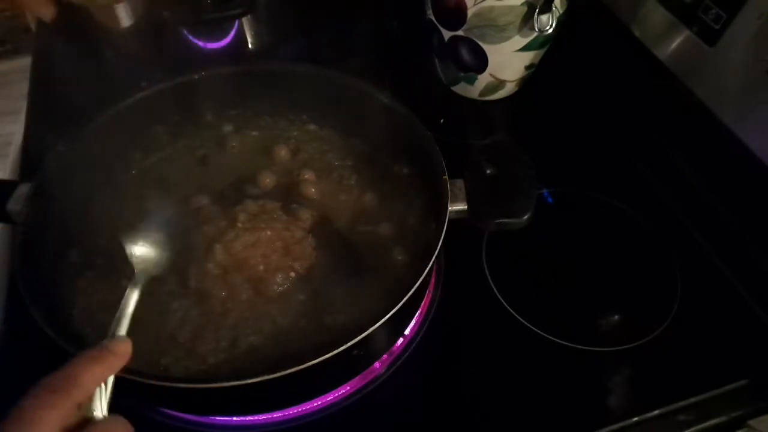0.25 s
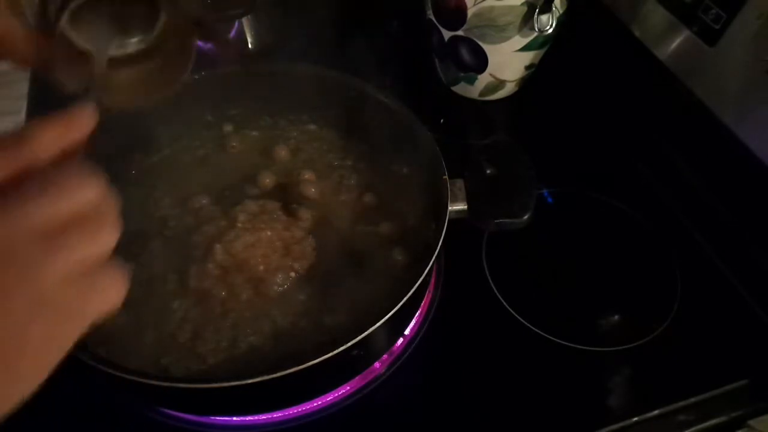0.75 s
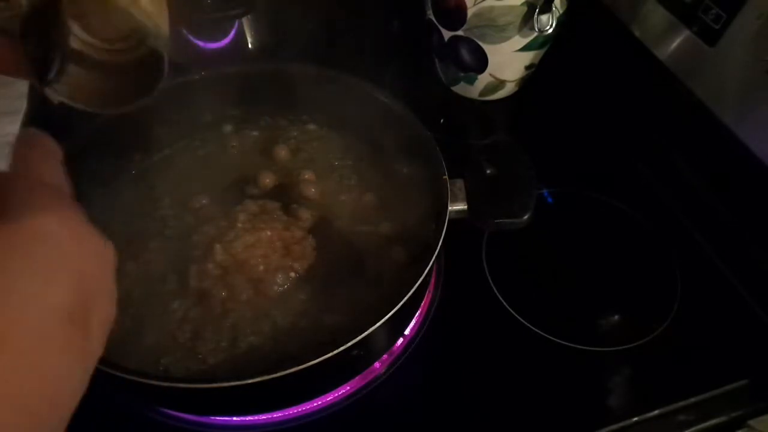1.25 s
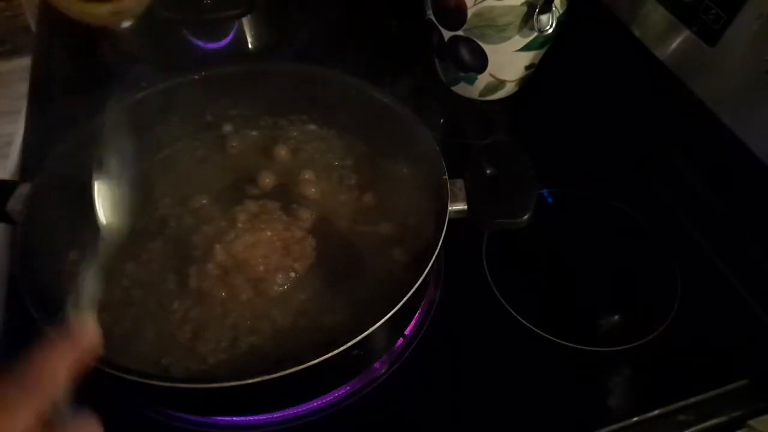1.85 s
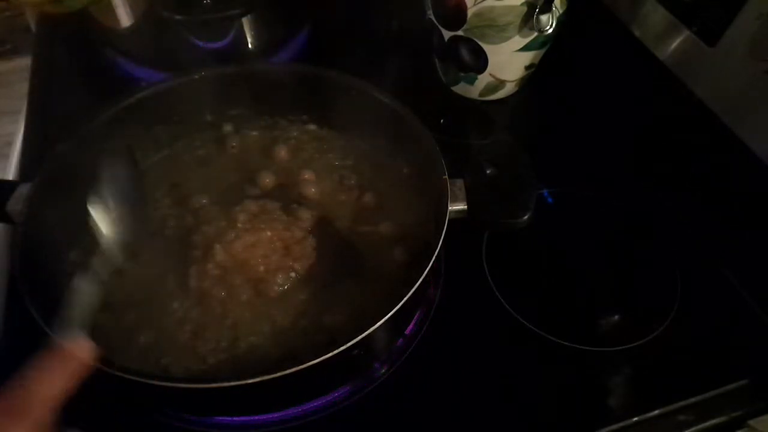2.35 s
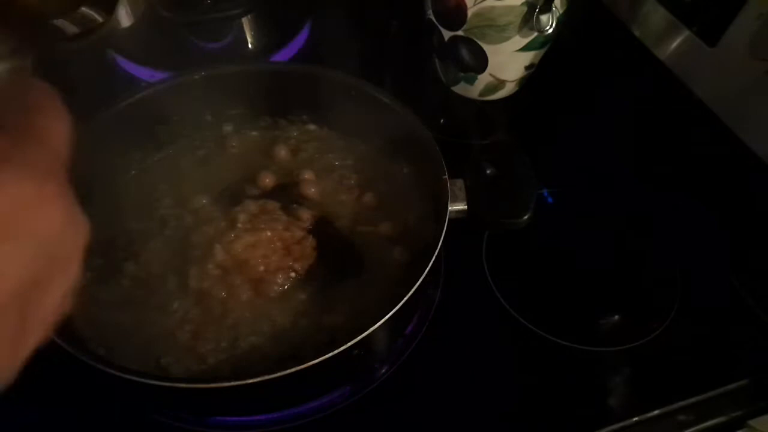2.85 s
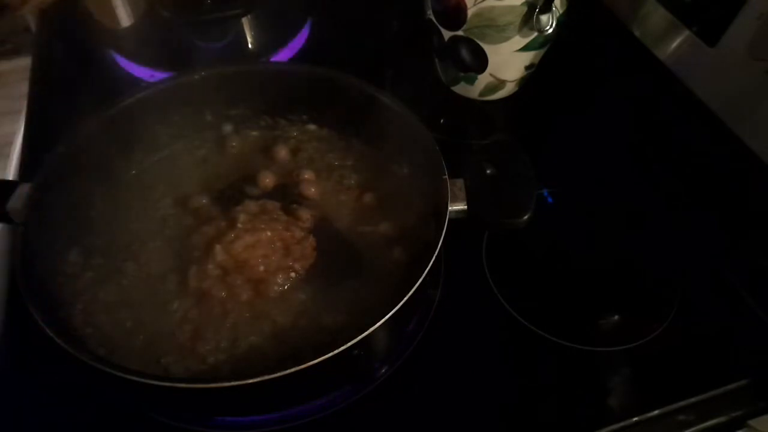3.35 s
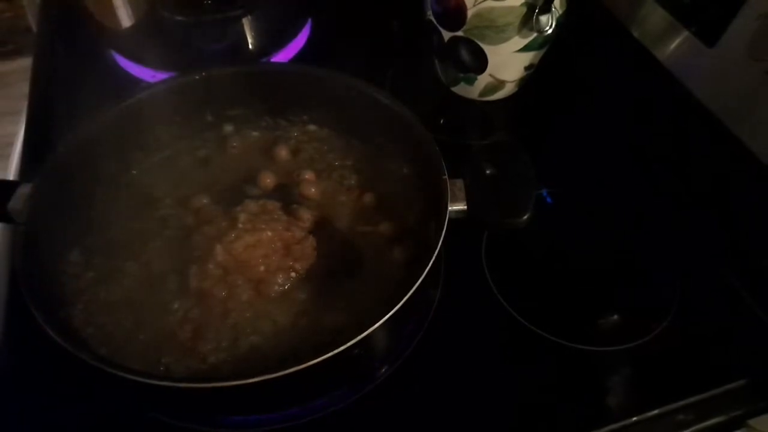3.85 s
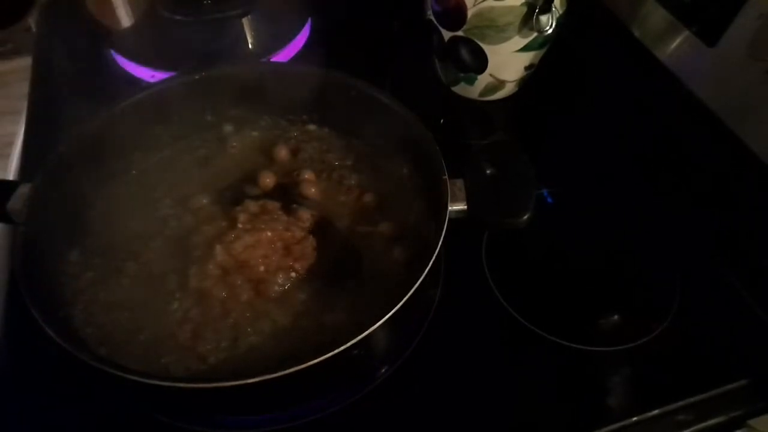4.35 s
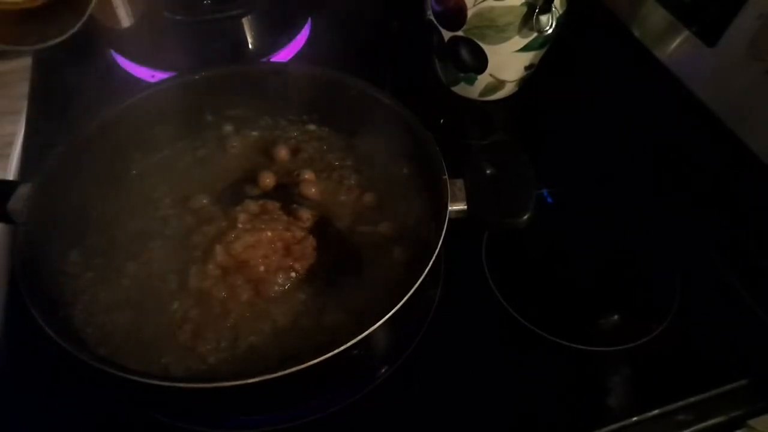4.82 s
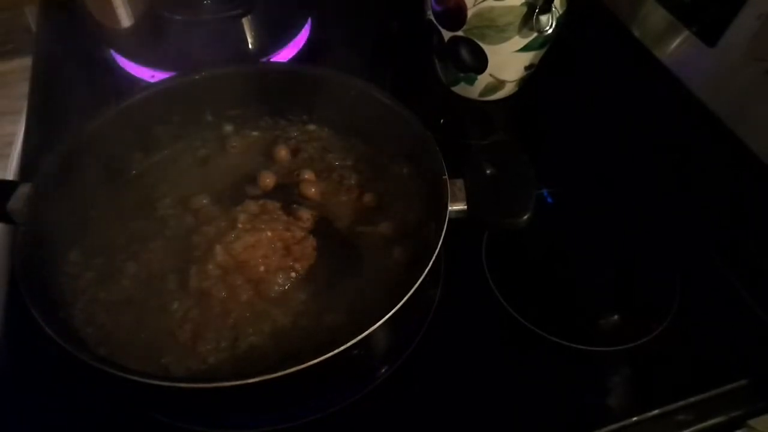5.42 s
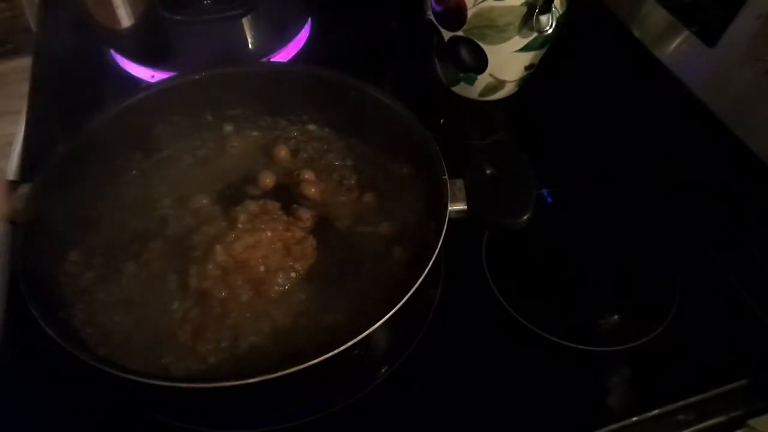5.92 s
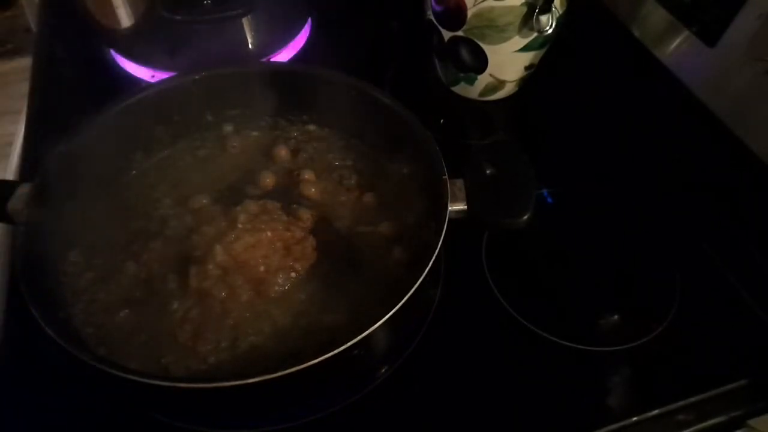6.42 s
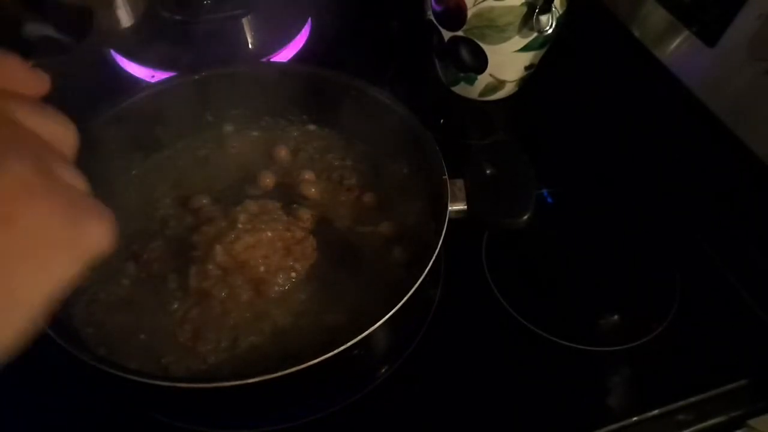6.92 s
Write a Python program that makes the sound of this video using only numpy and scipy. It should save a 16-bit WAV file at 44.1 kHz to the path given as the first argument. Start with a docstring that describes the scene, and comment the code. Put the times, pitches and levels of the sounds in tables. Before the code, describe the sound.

Two sharp double clanks of a spoon on a frying pan, each followed by hollow, ringing spoon taps in a tin can, with gentle frying beneath.

```python
"""In a small kitchen, a steel spoon digs chopped chilies out of a small can held close to the microphone.
A frying pan sizzles softly as noise with tiny pops, over a faint hum made from one sine wave.
Twice the spoon is knocked clean on the pan with a double blow: noise bursts plus the pan's own tones.
After each double blow it taps and scrapes in the can, whose air gives every touch a hollow note.
Each tap lands damped, then rebounds and lets the wall ring; the room adds a short tail."""
import sys
import numpy as np
from scipy import signal
from scipy.fft import rfft, irfft
from scipy.io import wavfile
from scipy.ndimage import uniform_filter1d, minimum_filter1d

SR = 44100
rng = np.random.default_rng(int(sys.argv[2]) if len(sys.argv) > 2 else 0)


def dump(signal):
    """Clip the signal to [-1, 1] and save it as 16-bit WAV at the path in sys.argv[1]."""
    limited = np.clip(np.atleast_2d(signal).T, -1, 1)
    pcm = np.round(limited * 32767).astype(np.int16)
    wavfile.write(sys.argv[1], SR, pcm)


N = 316197  # length of the scene in samples
T = np.arange(SR // 2) / SR  # time axis of one blow, s
BLOW = SR // 100  # 10 ms, the reference length for the energy of a blow
PORT_LAG_S = .00028  # the right microphone port is further from the can

# level of the frying hiss over time: t/s, level/dB
FRYING_LEVEL = [(0, -41.5), (.8, -45.5), (3.4, -43.5), (4.6, -48.5), (7.1, -45.5)]
# tone of the frying hiss: f/Hz, level/dB
SIZZLE_TONE = [(15, -48.5), (25, -25), (37, -14), (58, 2), (270, -10.5), (344, 1), (591, -3.5), (641, -6),
               (775, 0.5), (988, -1), (1520, 1), (2050, 0.5), (3160, -3.5), (12500, -7), (15000, 1.5),
               (16000, -2.5)]
# spoon on pan: t/s, level/dB, extra crash/dB, tilt of the pan tones by the spot struck/dB per octave
KNOCKS = [(0.2231, -6.5, 6.5, 6), (0.4268, -6.5, 6.5, 6.5), (2.049, -6.5, 9, 2.5), (2.259, -6, 7.5, 0)]
# tones of the pan on the glass hob, before tilt and scatter: f/Hz, level/dB, t60/s
PAN_MODES = [(93.4, -7.5, 0.3), (148, -8, 0.16), (218.5, 2.5, 0.072), (250, -8, 0.22), (346.5, 2, 0.12),
             (452, -25, 0.21), (564.3, -0.5, 0.078), (640.4, -16, 0.22), (1041, -11, 0.096),
             (1180, -7.5, 0.043), (1455, -15.5, 0.061), (2003, -20, 0.17), (2440, -25, 0.23),
             (3000, -21, 0.087), (5820, -20, 0.13)]
# bright crash of spoon on pan: f/Hz, level/dB
CRASH_TONE = [(1000, -55), (2000, -2), (3200, -2.5), (4500, -4.5), (6000, 1), (8300, -8.5), (10500, -8.5),
              (16000, 1)]
# thud of the pan into the hob: f/Hz, level/dB
THUD_TONE = [(20, -49), (60, -18), (120, -11.5), (300, -1), (600, 4.5), (850, -9.5), (1300, -7),
             (2200, -18.5), (6000, -37)]
# shivering tail of the pan: f/Hz, level/dB
SHIVER_TONE = [(150, 0), (400, 0), (700, 1.5), (1200, 5), (1700, -4.5), (2300, -5.5), (3100, -10),
               (4200, -16), (5900, -9), (8000, -13), (16000, -16.5)]
# spoon dragged along the can wall: start/s, length/s, strength/dB, rasp against note/dB, squeak f/Hz
SCRAPES = [(0.939, .063, -35, 0.5, 4420), (1.27, 0.095, -35, -21, 4040), (1.486, 0.092, -42, -5, 630),
           (1.545, .06, -44.5, 3, 1710), (1.593, 0.032, -40.5, 2.5, 2550), (2.824, .044, -47.5, 10, 3210),
           (2.986, 0.027, -26.5, -5.5, 4340), (3.602, 0.028, -49, 19, 4670),
           (3.869, 0.058, -49.5, 14, 4430), (4.352, 0.057, -46.5, 1.5, 5000),
           (6.07, 0.06, -39.5, 6.5, 3260), (6.369, .02, -51, 15, 6320), (7.098, 0.042, -48, -6, 4040)]
# spoon on can: t/s, strength/dB, clank against note/dB, tick against clank before its bite/dB,
# hollow note before the touch shifts it f/Hz, leading wall partial f/Hz, rebound after/s,
# rebound against landing/dB
TAPS = [(.867, -27, -17.5, 5, 1108, 3140, .003, -1), (.896, -14, -13, 2.5, 1119, 2630, 0.0049, 1.5),
        (1.014, -25, -18, 2, 1096, 2470, 0.0025, -1), (1.162, -33, -12, -3, 1130, 4410, .003, -3),
        (1.285, -28, -27, -4, 1050, 4050, 0.023, 1), (2.792, -26, -12, 6.5, 1054, 6550, .003, -5),
        (2.866, -16.5, -6.5, -4.5, 1257, 2585, .004, -1), (3.014, -18, -9.5, 0, 1087, 4126, .003, -4),
        (3.238, -41.5, -17, 2, 1100, 2530, .004, -2), (3.468, -43.5, 4.5, 3.5, 1160, 7630, .004, -7),
        (3.531, -13, -12, -1, 1211, 6370, .003, -3), (3.583, -15.5, -12, 6, 1250, 4650, 0.0097, -13),
        (3.632, -22.5, -9, 4.5, 1185, 2780, .007, 6), (3.685, -27, -9.5, -4, 1190, 4080, .004, -17),
        (3.841, -14, -8.5, -2.5, 1179, 3820, 0.0067, -9), (3.917, -16, -10.5, 3, 1148, 3950, 0.011, -1),
        (4.107, -16, -7.5, -2.5, 1267, 3450, 0.0079, -13), (4.161, -15, -8, -2.5, 1178, 4000, 0.016, 0),
        (4.334, -20, -11, -3, 1323, 2180, 0.005, -26), (4.383, -17, -5, -3, 1190, 4010, .017, 3),
        (4.614, -18, -10, 0.5, 1270, 2660, .008, 6), (4.668, -24, -16.5, -4, 1080, 3080, .004, -3.5),
        (4.827, -30, -10, 4.5, 1095, 3820, 0.0036, -7), (4.945, -18, -11.5, 5, 1187, 4326, 0.0074, -0.5),
        (5.005, -34.5, -8.5, -6, 1100, 2720, .004, 1.5), (5.145, -31.5, -1, 7.5, 1118, 3890, .004, -6),
        (5.246, -24, -9.5, 5, 1171, 4100, 0.0072, 7.5), (5.686, -26.5, -4, 2.5, 1095, 5150, .004, -3.5),
        (5.742, -26, -6, 8.5, 1140, 5500, .003, 0), (5.777, -26, -3.5, 6, 1065, 3536, .003, 1),
        (6.03, -35.5, -4.5, 3, 1113, 4200, 0.0057, -2), (6.069, -25.5, -7.5, 6.5, 1127, 7680, 0.015, 1),
        (6.288, -38, -18, -9, 1140, 3070, .004, -2), (6.388, -14.5, -12.5, 4.5, 1164, 2647, 0.0062, -2.5),
        (6.461, -14, -13.5, 1, 1179, 3876, 0.0071, -5), (6.669, -32, -10, -1.5, 1225, 3180, .004, -6),
        (6.72, -48.5, 3.5, 0.5, 1150, 3120, .004, -1.5), (6.794, -21, -14, 6, 1157, 3544, .003, -4.5),
        (6.885, -35.5, -14.5, -5, 1224, 2680, 0.0039, 0)]
# first touch of a tap: pitch as a share of the hollow note, note t60/s, bite of the tick/dB,
# free ring of the wall/dB, left minus right/dB
LANDING = (1.01, 0.06, 1, -12.5, 9)
# second touch of a tap: the same columns as LANDING
REBOUND = (0.94, .046, -2.5, -2, 1.5)
# tones of the thin can wall, before scatter: f/Hz, level/dB, t60/s
CAN_MODES = [(1149, -3.5, 0.48), (1303, -5, 0.16), (1870, -3, 0.15), (2563, 0.5, 0.18), (2948, -1, 0.092),
             (3386, 5, 0.1), (4160, 1.5, 0.16), (4623, 4.5, 0.051), (5520, -0.5, 0.11),
             (5680, -12.5, 0.094), (5700, -23, 0.05), (7550, -5, 0.15), (9500, 4, 0.12)]
# tones of the air in the can: ratio to its pitch, level/dB, share of its t60
NOTE_MODES = [(1.002, 1, 1), (1.091, -6, 0.62), (1.188, -8.5, 0.82)]
# metal clank of spoon on can: f/Hz, level/dB
CLANK_TONE = [(100, -52), (330, -15), (600, -7.5), (900, -2), (1450, 7), (2100, 8), (2700, 9.5), (3100, 8),
              (4000, 11.5), (5100, 6.5), (6000, 15), (7300, 6), (8500, 2), (16000, -40)]
# sharp tick of spoon on can, also used for the oil pops: f/Hz, level/dB
TICK_TONE = [(2000, -24.5), (5500, -35), (7200, -8), (8400, -12.5), (9700, -1.5), (12000, -3),
             (15000, -4.5), (16500, -8)]
# low bump: f/Hz, level/dB
BUMP_TONE = [(15, -11), (30, -4), (55, -5), (110, -15), (250, -29), (1500, -74)]
# tone of the room's tail: f/Hz, level/dB
ROOM_TONE = [(100, 13.0), (500, 6.5), (1200, -0.5), (2500, 7.0), (6000, 0.0), (10000, 2.0), (16000, -4)]


def undb(db):
    """Turn decibels into a gain."""
    return 10 ** (np.asarray(db) / 20)


def unit(x):
    """Scale a blow so that its energy equals 10 ms at rms 1."""
    return x * np.sqrt(BLOW / np.sum(x ** 2, axis=-1, keepdims=True))


def level(x, db):
    """Scale to an rms level."""
    return x * undb(db) / np.sqrt(np.mean(x ** 2))


def fade(t60):
    """Exponential decay that falls by 60 dB in t60 seconds."""
    return np.exp(-np.log(1000) * T / t60)


def rise(rise_s, t=T):
    """Soft start: the sound builds up instead of jumping in."""
    return 1 - np.exp(-t / rise_s)


def add(out, s, x):
    """Mix x into out at time s."""
    i = max(int(s * SR), 0)
    out[:, i:i + x.shape[1]] += x[:, :N - i]


def colour(x, points):
    """Shape the tone through (f/Hz, level/dB) points with a filter that never rings ahead of the sound."""
    hz, db = np.transpose(points)
    size = 4096
    grid = np.maximum(np.fft.rfftfreq(size, 1 / SR), 1)
    curve_db = np.interp(np.log(grid), np.log(hz), db)
    # folding the cepstrum (spectrum of the log spectrum) gives the filter minimum phase
    cepstrum = irfft(np.log(undb(curve_db)))
    cepstrum[1:size // 2] *= 2
    cepstrum[size // 2 + 1:] = 0
    response = irfft(np.exp(rfft(cepstrum)))
    return signal.fftconvolve(x, response[None], axes=1)[:, :x.shape[1]]


def sides(db):
    """Left and right gains for a level difference, left minus right."""
    return undb(np.array([[db], [-db]]) / 2)


def ports(x, lag_s):
    """One sound at both microphone ports, the right one later."""
    t = np.arange(len(x)) / SR
    late = np.interp(t - round(lag_s * SR) / SR, t, x, left=0)
    return np.array([x, late])


def share_lows(x, below_hz):
    """Long waves reach both ports alike, so the low parts of both sides are drawn together."""
    lowpass = signal.butter(1, below_hz, fs=SR, output="sos")
    low = signal.sosfilt(lowpass, x[0] - x[1])
    return x + low * np.array([[-.5], [.5]])


def wander(per_s):
    """Random drift with an rms of 1, about per_s new values a second."""
    hold = int(SR / per_s)
    steps = np.repeat(rng.standard_normal(N // hold + 1), hold)
    return level(uniform_filter1d(steps, hold)[:N], 0)


def burst(points, t60, apart, lag_s, rise_s=0.00034):
    """Countless short overtones: decaying noise, partly different at the two ports."""
    shared = ports(rng.standard_normal(len(T)), lag_s)
    noise = shared + apart * rng.standard_normal((2, len(T)))
    return unit(colour(noise * fade(t60) * rise(rise_s), points))


def ring(modes, detune, spread, scatter_db=3):
    """Decaying tones; each blow meets them with its own strength and slightly shifted pitch."""
    out = 0
    for hz, db, t60 in modes:
        pitch, size, turn = rng.standard_normal(3)
        phase = np.array([[0], [turn * spread * min(hz / 1500, 2)]])  # the ports differ in phase
        tone = np.sin(2 * np.pi * hz * (1 + detune * pitch) * T - phase)
        out = out + undb(db + scatter_db * size) * fade(t60) * tone
    return unit(out)


def hum(hz=56.8, db=-70.5):
    """A faint steady hum: one low sine wave."""
    t = np.arange(N) / SR
    return level(np.sin(2 * np.pi * hz * t), db)


def frying(pops_per_s=260, pop_db=-11, scatter_db=0.5, flutter_db=1.5, pan_db=2):
    """A fine fluttering hiss of steam, with tiny bubbles bursting in the oil."""
    t = np.arange(N) / SR
    hiss = share_lows(colour(rng.standard_normal((2, N)), SIZZLE_TONE), below_hz=600)
    hiss = hiss * undb(flutter_db * wander(per_s=18))
    sizes = undb(scatter_db * np.minimum(rng.exponential(size=N), 5))
    sizes = sizes * (rng.random(N) < pops_per_s / SR)  # bubbles burst at random moments
    pop = burst(TICK_TONE, t60=0.053, apart=1, lag_s=0)
    pops = signal.fftconvolve(pop, sizes[None], axes=1)[:, :N]
    loudness = undb(np.interp(t, *np.transpose(FRYING_LEVEL)))
    return (level(hiss, 0) + level(pops, pop_db)) * loudness * sides(pan_db)


def kitchen(x, wet_db, t60=0.45, build_s=0.0059):
    """Cupboards and tiles return a short diffuse tail, duller than the direct sound."""
    tail = rng.standard_normal((2, len(T))) * fade(t60) * rise(build_s)
    tail = tail / np.sqrt(np.sum(tail ** 2) / 2)
    tail = colour(share_lows(tail, below_hz=500), ROOM_TONE)
    return x + undb(wet_db) * signal.fftconvolve(x, tail, axes=1)[:, :N]


def bump(at_s=5.74, db=-35):
    """A soft, low bump while the can is handled: a short burst of dull noise."""
    out = np.zeros((2, N))
    thump = burst(BUMP_TONE, t60=0.079, apart=0.76, lag_s=0, rise_s=.01)
    add(out, at_s, undb(db) * thump)
    return out


def knocks(ring_db=-6, thud_db=-7, crash_db=-10, shiver_db=-21, pan_db=2.5):
    """The spoon strikes the pan: a steel crash, the pan's own tones, a thud into the hob and a shivering tail."""
    out = np.zeros((2, N))
    for s, db, extra_crash_db, tilt_db in KNOCKS:
        modes = []
        for hz, mode_db, t60 in PAN_MODES:
            octaves = np.log2(np.clip(hz, 200, 1200) / 500)
            modes.append((hz, mode_db + tilt_db * octaves, t60))
        tones = ring(modes, detune=0.0067, spread=2.8, scatter_db=2.0) * rise(0.0024)
        thud = burst(THUD_TONE, t60=0.058, apart=1.0, lag_s=.0001, rise_s=0.00017)
        shiver = burst(SHIVER_TONE, t60=0.42, apart=0.68, lag_s=.0001, rise_s=0.0024)
        crash = burst(CRASH_TONE, t60=0.058, apart=1.0, lag_s=.0001, rise_s=0.00043)
        blow = undb(ring_db) * tones + undb(thud_db) * thud + undb(shiver_db) * shiver
        blow += undb(crash_db + extra_crash_db) * crash
        add(out, s, blow * undb(db) * sides(pan_db))
    return out


def partial(hz, t60, rise_s=0.0026):
    """One damped resonance of the can: a sine that swells quickly and dies away."""
    return unit(ports(np.sin(2 * np.pi * hz * T) * fade(t60) * rise(rise_s), PORT_LAG_S))


def contact(points, t60, apart, count=70, noise_db=-3, rise_s=0.00025):
    """Pressed together, spoon and can ring with a new set of short partials at every spot."""
    t = T[:SR // 10]
    place, turn, size = rng.random((3, count, 1))
    hz = np.interp(place, [0, 1], [1500, 15500])
    partials = np.sum(size ** 2 * np.sin(2 * np.pi * (hz * t + turn)), axis=0)
    partials = partials * fade(t60)[:len(t)] * rise(rise_s, t)
    partials = np.pad(partials, (0, len(T) - len(t)))
    partials = unit(colour(ports(partials, PORT_LAG_S), points))
    return unit(partials + undb(noise_db) * burst(points, t60, apart, PORT_LAG_S, rise_s))


def hollow(hz, t60, rise_s=0.0018, lag_s=0.00031, blur_db=-8.0, base_hz=345, base_db=-28):
    """The air in the can rings, damped by the wet filling; noise blurs the note and the base knocks along."""
    note = 0
    for ratio, db, share in NOTE_MODES:
        tone = np.sin(2 * np.pi * (hz * ratio * T + rng.random()))
        note = note + undb(db) * tone * fade(t60 * share)
    note = unit(ports(note * rise(rise_s), lag_s))
    # the blur is noise that peaks around the note: f/Hz, level/dB
    around_note = [(150, -42), (300, -25), (480, -19), (750, -21), (hz, 0), (hz * 1.12, 0),
                   (1900, -22), (5000, -50)]
    blur = burst(around_note, t60=0.057, apart=0.24, lag_s=lag_s)
    return unit(note + undb(blur_db) * blur + undb(base_db) * partial(base_hz, t60=0.081))


def scrapes(slips_per_s=900, note_hz=1130, wall_db=-13, squeak_db=-2, pan_db=5):
    """The spoon's edge sticks and slips: a swelling and fading run of tiny uneven blows on the can."""
    out = np.zeros((2, N))
    for s, length, db, rasp_db, squeak_hz in SCRAPES:
        chance, size = rng.random((2, len(T)))
        swell = np.sin(np.pi * np.minimum(T / length, 1))
        slips = (chance < slips_per_s / SR) * size ** 2 * swell
        rasp = contact(CLANK_TONE, t60=0.064, apart=0.85, noise_db=-1.0)
        rasp += contact(TICK_TONE, t60=0.033, apart=0.84, noise_db=17.0)
        rasp += undb(wall_db) * ring(CAN_MODES, detune=0.0072, spread=0.8)
        rasp += undb(squeak_db) * partial(squeak_hz, t60=0.024)
        note = hollow(note_hz, t60=0.036)
        for body, body_db in ((note, db), (rasp, db + rasp_db)):
            run = unit(signal.fftconvolve(body, slips[None], axes=1))
            run = run * np.sqrt(length * SR / BLOW)  # a longer scrape holds more energy
            add(out, s, run * undb(body_db) * sides(pan_db))
    return out


def touch(db, clank_db, tick_db, note_hz, wall_hz, manner, partial_db=-3, partial_t60=0.05):
    """One touch sounds the hollow note, a clank led by one partial, a tick and the wall's free ring."""
    share, t60, bite_db, ring_db, pan_db = manner
    metal = contact(CLANK_TONE, t60=0.072, apart=1.4, noise_db=-3)
    metal += undb(partial_db) * partial(wall_hz, partial_t60)
    metal += undb(tick_db + bite_db) * contact(TICK_TONE, t60=0.044, apart=4.8, noise_db=8)
    metal += undb(ring_db) * ring(CAN_MODES, detune=0.01095, spread=0.82, scatter_db=3.5)
    note = hollow(note_hz * share, t60)
    return undb(db) * (note + undb(clank_db) * metal) * sides(pan_db)


def taps():
    """The spoon lands and damps the wall, then rebounds with a slightly lower note and leaves it ringing."""
    out = np.zeros((2, N))
    for s, db, clank_db, tick_db, note_hz, wall_hz, rebound_s, rebound_db in TAPS:
        landing = touch(db, clank_db, tick_db, note_hz, wall_hz, LANDING)
        rebound = touch(db + rebound_db, clank_db, tick_db, note_hz, wall_hz, REBOUND)
        add(out, s, landing)
        add(out, s + rebound_s, rebound)
    return out


def scene():
    """The can is held near the microphone; the pan is further off and brings slightly more of the room."""
    background = frying() + hum()
    pan = kitchen(knocks(), wet_db=-15.0)
    can = kitchen(bump() + scrapes() + taps(), wet_db=-15.5)
    return background + pan + can


def record(dry, ceiling=.92, bass_cut_hz=38, top_hz=15600):
    """A quick limiter turns down the hardest blows; then the deepest bass and the top are cut."""
    peak = np.maximum(np.abs(dry).max(axis=0), 1e-9)
    gain = np.minimum(1, ceiling / peak)
    # the gain moves smoothly, over about 1 ms
    gain = uniform_filter1d(minimum_filter1d(gain, size=49), size=49)
    bass_cut = signal.butter(2, bass_cut_hz, "high", fs=SR, output="sos")
    top_cut = signal.ellip(8, .2, 70, top_hz, fs=SR, output="sos")
    return signal.sosfilt(top_cut, signal.sosfilt(bass_cut, dry * gain))


dry = scene()
out = record(dry)
dump(out)
```